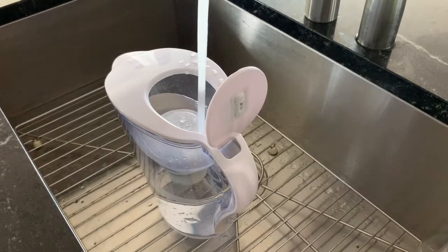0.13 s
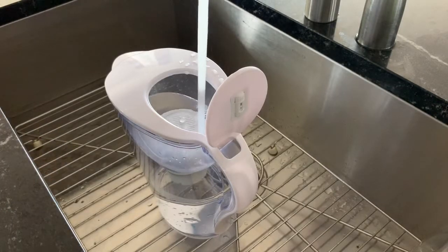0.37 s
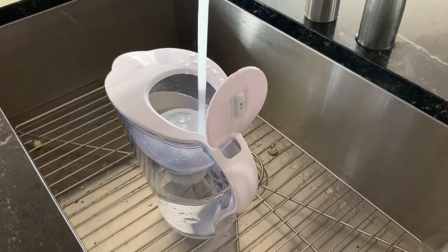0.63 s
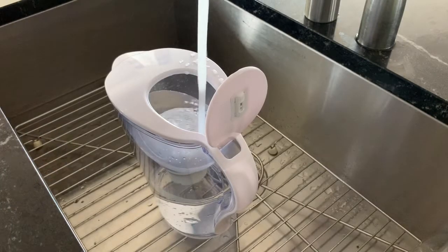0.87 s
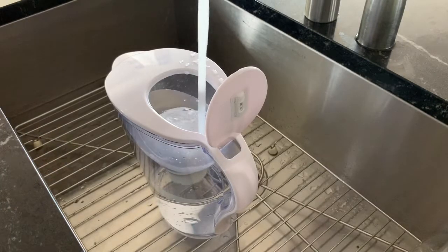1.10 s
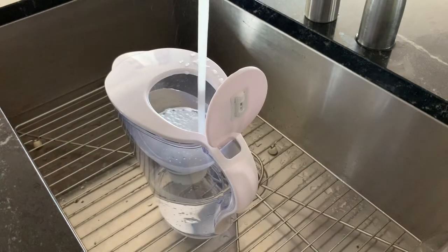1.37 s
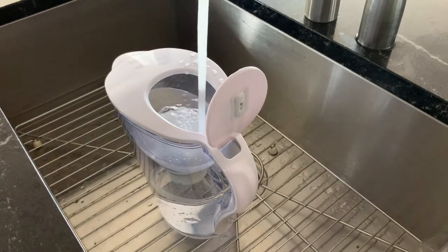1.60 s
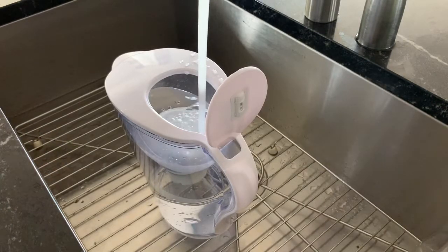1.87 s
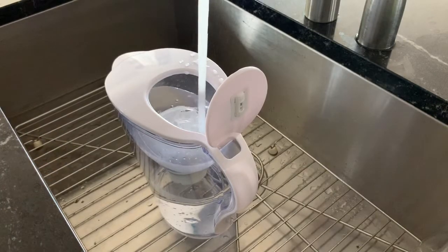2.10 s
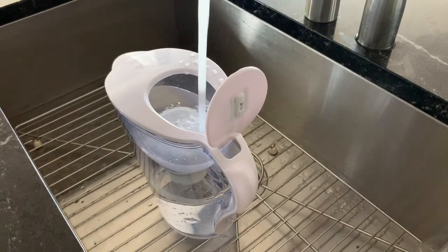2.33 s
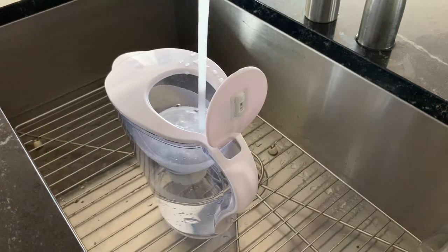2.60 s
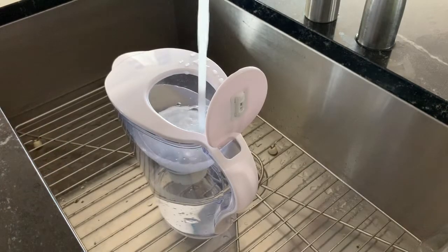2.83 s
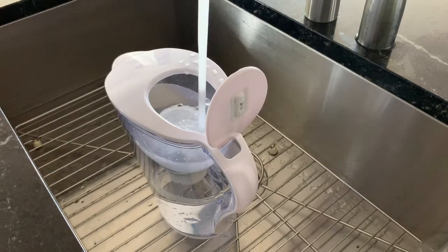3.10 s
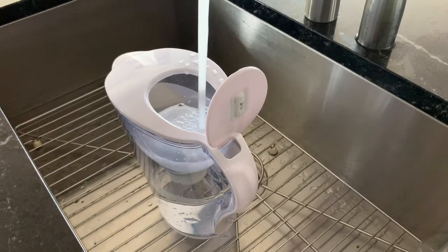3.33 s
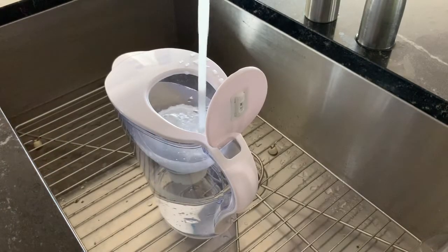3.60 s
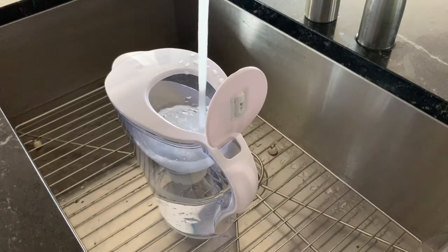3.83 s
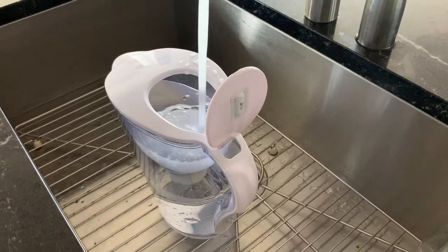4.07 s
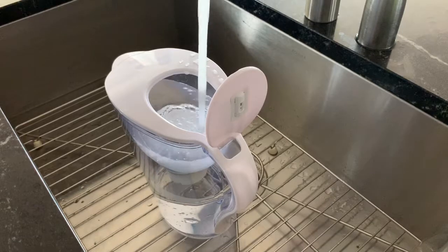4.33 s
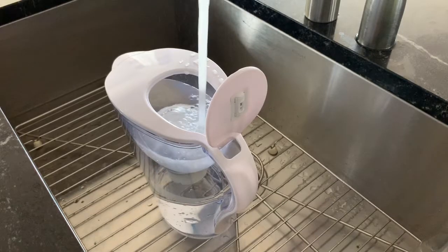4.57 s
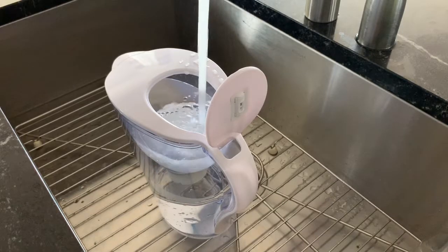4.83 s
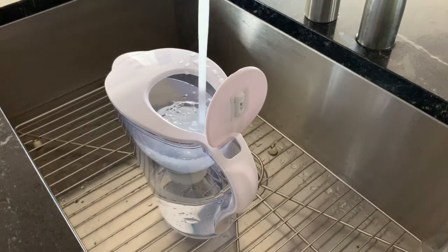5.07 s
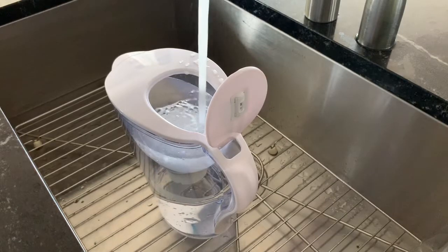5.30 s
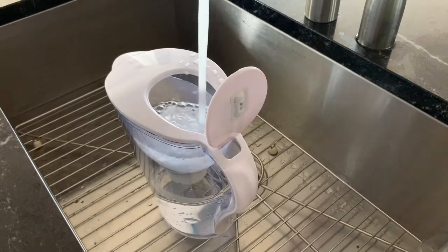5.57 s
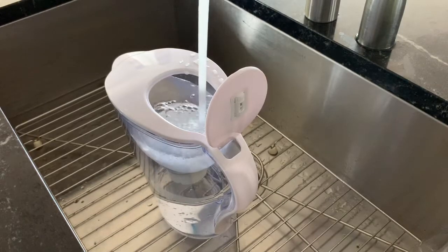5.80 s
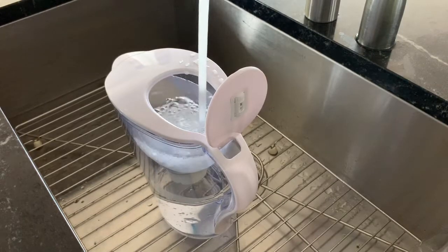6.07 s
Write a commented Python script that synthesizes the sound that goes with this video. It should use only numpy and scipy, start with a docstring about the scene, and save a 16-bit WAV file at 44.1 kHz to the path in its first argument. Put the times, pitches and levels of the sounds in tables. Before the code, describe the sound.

A kitchen tap runs steadily into a plastic filter pitcher in a steel sink, hissing brightly over bubbling, gulping water that slowly rises in pitch.

```python
"""A kitchen tap runs steadily into the top reservoir of a plastic filter pitcher in a steel sink.
The aerated nozzle is noise that throbs, chokes and sputters; the splash on the foam is noise and grains.
Churning noise and bursting bubbles ring the plastic walls and the air pockets, whose pitch climbs.
Early spatter is ringing ticks; a low wash, room rumble and the sine hum of a far-off fridge lie below."""
import sys
import numpy as np
from scipy import signal
from scipy.fft import rfft, irfft
from scipy.io import wavfile
from scipy.ndimage import uniform_filter1d

SR = 44100
rng = np.random.default_rng(int(sys.argv[2]) if len(sys.argv) > 2 else 0)


def master(y):
    """Save y as 16-bit WAV."""
    cut = np.clip(np.atleast_2d(y).T, -1, 1)
    pcm = np.round(cut * 32767)  # scale
    wavfile.write(sys.argv[1], SR, pcm.astype(np.int16))


def field_ratio(decibels):
    """Amplitude ratio for a level in dB (20 dB per decade); scalars and array-likes work."""
    return 10 ** (np.asarray(decibels, dtype=float) / 20)


N = 272538  # length [samples]

# Colour of the room rumble and low wash: (frequency [Hz], relative level [dB])
ROOM_COLOUR = [(15, -39), (25, -11), (61, -8), (102, -5.5), (167, -5.5), (252, -8), (548, -2), (776, -21),
               (1000, -9.5), (1150, -10), (1430, -42)]
# One path, the same left and right: (left delay [ms], left gain [ratio], right delay [ms], right gain [ratio])
DIRECT_PATH = [(0, 1, 0, 1)]
# Churning of the water: (time [s], level [dB], share that stirs the reservoir, not the lower chamber [0-1])
CHURN = [(0.0, -33.5, 0), (0.45, -31, .05), (0.8, -32, 0.33), (1.2, -32.5, 0.3), (1.75, -31, 0.38),
         (1.95, -29.5, 0.48), (2.25, -32.5, 0.57), (2.5, -31, .6), (3.0, -30.5, 0.64), (3.35, -32, 0.8),
         (3.7, -32.5, .9), (4.3, -32.5, 1), (4.7, -30.5, 0.82), (5.25, -31, 0.88), (5.55, -32, 0.85),
         (5.85, -32.5, 0.73), (6.18, -30, 0.68)]
# Air pockets, lower chamber then reservoir:
# (start pitch [Hz], rise [Hz/s], relative level at share 0 [dB], relative level at share 1 [dB])
AIR_POCKETS = [(399, 8.8, 3.5, -10.5), (570, 5.2, -12.5, 4)]
# Modes of the pitcher walls: (frequency [Hz], width [Hz], relative level [dB], left over right [dB])
WALL_MODES = [(117, 8.7, -13.5, -2), (163.2, 15.7, -5, 0), (199.7, 8.5, -13.5, 0), (317, 39, -14, -3),
              (361, 49, -18, -2), (460, 41, -8, 6.5), (574, 65, -10.5, 4), (642, 36, -18.5, -10),
              (982, 205, -19, 0), (1314.5, 78, -3.5, 2), (1415.4, 47, -4, 9), (1503, 84, -7, 5),
              (1608, 30, -7.5, 4), (1683, 125, -11, 11)]
# Large bubbles bursting: (time [s], relative snap level [dB], relative gulp level [dB], gulp pitch [Hz])
BUBBLES = [(0.0324, -49, -34.5, 440), (0.1096, -39, -36, 450), (0.179, -37, -36, 440),
           (0.3257, -38, -43, 460), (0.3594, -39, -32.5, 457), (0.5244, -32, -30, 456),
           (0.7794, -51, -35.5, 426), (0.9624, -43, -32, 464), (1.0111, -41, -34, 420),
           (1.1458, -29.5, -49, 435), (1.2022, -33, -40, 456), (1.3982, -34, -48, 470),
           (1.5708, -32.5, -41, 440), (1.6796, -36, -50, 440), (1.8394, -31.5, -30.5, 570),
           (2.136, -34.5, -53, 441), (2.3141, -37.5, -35.5, 630), (2.4758, -36, -46, 463),
           (2.824, -37, -56, 564), (2.9542, -39, -39, 610), (3.2854, -52, -35.5, 550),
           (3.5887, -34, -36, 580), (3.6556, -35.5, -48, 580), (3.9194, -43, -33, 596),
           (3.9994, -55, -31, 577), (4.1555, -33, -56, 620), (4.2592, -53, -34, 590),
           (4.6778, -37.5, -30.5, 560), (4.804, -30, -43, 576), (5.1312, -25.5, -32, 593),
           (5.2415, -30, -43, 603), (5.3677, -36, -33.5, 550), (5.6441, -30.5, -30, 641),
           (5.9813, -33, -46, 589), (5.9988, -27.5, -28, 600), (6.0876, -33, -33, 567),
           (6.137, -47, -47, 560)]
# Glugs that thump the pitcher's base: (time [s], relative level [dB])
GLUGS = [(0.348, -50), (0.384, -47.5), (0.53, -48), (0.616, -50), (1.73, -51), (1.842, -42), (2.389, -51),
         (2.774, -51), (2.924, -42.5), (2.96, -43), (3.299, -55), (3.584, -46.5), (4.087, -44), (4.37, -43),
         (4.47, -47), (4.668, -43), (4.83, -47), (4.941, -42.5), (5.138, -36.5), (5.647, -41.5),
         (6.005, -39.5), (6.095, -45), (6.14, -44)]
# Colour of the splash: (frequency [Hz], relative level [dB], left over right [dB],
# diffuse scatter over the direct paths [dB])
SPLASH_COLOUR = [(726, -29.5, 7, 2), (1156, -19, 15.5, -2), (1526, -6, 5.5, 0), (2100, -1.5, -1.5, -5.5),
                 (2540, -1.5, -0.7, -6), (2720, -6, 0.2, -9), (2805, -1.5, 1.5, -8.5), (2910, 0, 2.5, -3.5),
                 (3240, -4, 4.5, -4.5), (3200, -0.5, 4, -3), (3500, -6, 0, -2.5), (3630, -4.5, 3.8, -3.5),
                 (4090, -6.5, -1.2, 3.5), (4510, -9, -4.5, -1.5), (4580, -3.5, 1.5, -0.5),
                 (4850, -8.5, -12, 0.7), (5020, -11, -2, -1), (5040, -4, -6, 3), (5340, -4.5, 1.3, 0),
                 (6650, -0.36, -2, -0.2), (6880, -42, -3, -1)]
# Splash paths, direct and echoed: (left delay [ms], left gain [ratio], right delay [ms], right gain [ratio])
SPLASH_PATHS = [(-0.797, -0.16, -0.731, 0.12), (-0.637, -0.28, -0.578, 0.31), (0.0, 1.0, -0.046, 0.23),
                (1.281, 0.35, 0.14, 1.0), (1.444, 0.47, 1.458, 0.11), (1.632, -0.19, 1.795, -0.23),
                (1.83, -0.48, 2.155, 0.16), (2.052, -0.25, 2.533, -0.35), (2.148, 0.49, 2.695, -0.2),
                (2.574, -0.2, 2.944, 0.1), (2.897, 0.21, 3.304, -0.14), (3.02, 0.32, 3.639, 0.2),
                (3.347, -0.38, 3.993, -0.16), (3.558, -0.19, 4.34, 0.15), (4.147, -0.1, 4.527, 0.2),
                (5.218, 0.08, 4.874, -0.11)]
# Flow through the tap: (time [s], hiss drive level [dB])
FLOW = [(0.0, -30.5), (0.6, -31.5), (1.25, -31.5), (1.32, -35), (1.45, -32.5), (2.0, -32.5), (3.0, -32.5),
        (4.0, -33), (5.0, -33), (5.3, -32.5), (6.18, -33)]
# Sputters of the nozzle: (time [s], relative level [dB])
SPUTTERS = [(0.0528, -34), (0.1077, -34), (0.175, -32), (0.182, -28), (0.3222, -30), (0.341, -26),
            (0.3825, -27), (0.4403, -20.5), (0.45, -29), (0.517, -23.5), (0.5506, -22.5), (0.577, -29),
            (0.613, -28), (0.7472, -25), (0.7826, -26), (0.858, -27), (0.8964, -29), (1.1124, -26),
            (1.2466, -28), (1.3927, -28), (1.5214, -28), (1.6437, -30), (1.9749, -26), (2.0308, -27),
            (2.138, -33), (2.2463, -26), (2.2887, -25.5), (2.4823, -26.5), (2.7746, -26), (3.0954, -22.5),
            (3.8676, -27), (3.9305, -26), (4.1915, -23.5), (4.2921, -28), (4.7691, -26), (4.9482, -26),
            (5.02, -25.5), (5.0684, -25), (5.1198, -25), (5.2889, -29), (5.9145, -30), (6.094, -23.5)]
# Colour of the hiss: (frequency [Hz], relative level [dB], left over right [dB],
# diffuse scatter of the sink over the direct paths [dB])
HISS_COLOUR = [(6000, -47, -3, 1), (6860, -10, -12, 1), (7100, -4.5, 0.5, -3.5), (8340, -2, 0.1, -7),
               (10100, -1.2, -0.5, -7.5), (11200, -1, 2, -15.5), (12700, -1.1, -1, -5.5),
               (13800, -1.5, -0.1, -15), (15300, -4.5, 1, -15), (15740, -8, 3, -16), (15950, -26, -2, -19)]
# Hiss path and echoes off sink walls and pitcher, timed from the strongest:
# (left delay [ms], left gain [ratio], right delay [ms], right gain [ratio])
HISS_PATHS = [(0.0, 1.0, -0.22, 1.0), (0.638, -0.08, 0.208, -0.07), (0.8, 0.07, 0.297, 0.18),
              (0.897, -0.14, 0.68, -0.11), (1.18, -0.11, 0.965, -0.15), (1.258, 0.05, 1.049, 0.09),
              (1.731, -0.04, 1.598, 0.06), (1.816, 0.08, 1.838, -0.06), (2.314, -0.06, 2.209, -0.06),
              (2.392, 0.1, 2.358, -0.09), (2.535, 0.08, 2.494, -0.06), (2.764, 0.05, 2.655, 0.06),
              (2.882, 0.06, 2.808, -0.06), (3.283, 0.07, 3.105, -0.06), (3.437, -0.09, 3.218, -0.09),
              (3.684, 0.06, 3.466, 0.06)]

HUM_HZ, HUM_DB = 59.2, -64
WASH_DB, WASH_MUFFLED_DB = -24.5, -3  # low wash against the churning; its drop as the reservoir takes over
SPATTER_HZ, SPATTER_WIDTH_HZ = 2700, 300
SPATTER_START_DB, SPATTER_FADE_DB_PER_S = -61.5, -9
UPPER_START_HZ, UPPER_RISE_HZ_PER_S = 1345, 16.5  # upper mode of the air pocket
FOAM_DB = -9  # splash on the foam, against the flow level
CHOKE_DB, CHOKE_LEAD_S, CHOKE_S = -2.5, 0.011, 0.0087  # depth per dip, lead before a sputter, 1/e half width


def evened(x):
    """Scales to rms 1."""
    return x / np.sqrt(np.mean(x ** 2) + 1e-20)


def curve(rows):
    """Each column of a time table, sample by sample."""
    s, *columns = np.transpose(rows)
    return [np.interp(np.arange(N) / SR, s, c) for c in columns]


def spectrum(rows, hz):
    """Each column of a frequency table, on a log axis."""
    f, *columns = np.transpose(rows)
    return [np.interp(np.log(hz + 1), np.log(f + 1), c) for c in columns]


def resonate(x, hz, width_hz):
    """Shifts the curve hz down to zero, smooths, and shifts back: a resonance of gain 1."""
    turn = np.exp(2j * np.pi * np.cumsum(hz * np.ones(N)) / SR)
    r = np.exp(-np.pi * width_hz / SR)
    smooth = signal.lfilter([1 - r], [1, -r], x / turn)
    return 2 * (turn * smooth).real


def wander(hz, width_hz):
    """Irregular wobble around a rate, rms 1."""
    return evened(resonate(rng.standard_normal(N), hz, width_hz))


def clicks(rows):
    """One impulse for each (time, level) row of an event table."""
    x, rows = np.zeros(N), np.asarray(rows)
    x[np.minimum((rows[:, 0] * SR).astype(int), N - 1)] = field_ratio(rows[:, 1])
    return x


def grains(per_s, spread_db):
    """Random impulses, most small, a few large, rms 1."""
    size = field_ratio(spread_db * np.minimum(rng.exponential(1, N), 5))
    size = size * rng.choice([-1., 1.], N)
    return evened(size * (rng.random(N) < per_s / SR))


def stereo_paths(x, colour, paths, level=1):
    """Sends a source along its paths to left and right and adds unrelated scatter to each side."""
    hz = np.fft.rfftfreq(N, 1 / SR)
    db, pan_db, scatter_db = colour
    out = field_ratio(scatter_db) * rfft(level * rng.standard_normal((2, N)))
    source = rfft(level * evened(x))
    for k in range(2):
        # each path is a delay and a gain
        response = sum(row[2 * k + 1] * np.exp(-2j * np.pi * hz * row[2 * k] / 1000) for row in paths)
        out[k] += response * source
    return irfft(out * field_ratio(db + np.array([pan_db / 2, -pan_db / 2])), N)


def patchy(x, db, bins, frames):
    """Level drifts in small random patches of time and frequency, alike on both sides."""
    z = signal.stft(x, nperseg=256)[2]
    patches = rng.standard_normal(z.shape[:0:-1]).T
    patches = uniform_filter1d(patches, size=bins, axis=0)
    patches = evened(uniform_filter1d(patches, size=frames, axis=1))
    return signal.istft(z * field_ratio(db * patches), nperseg=256)[1][:, :N]


def rising(start_hz, hz_per_s):
    """Pitch of an air pocket that shrinks steadily as the water fills."""
    return start_hz + hz_per_s * np.arange(N) / SR


def fridge():
    """A far-off fridge: one sine hum whose phase and level waver a little."""
    t = np.arange(N) / SR
    side_phase = np.array([[-.25], [.25]])
    phase = 2 * np.pi * HUM_HZ * t + 0.44 * wander(.5, 2.1) + side_phase
    hum = np.sqrt(2) * np.sin(phase) * field_ratio(HUM_DB + 1.5 * wander(1, 4.3))
    return field_ratio([[-1.1], [1.1]]) * hum


def room_and_wash():
    """Steady room rumble below, and above it a low wash in sink and room that follows the churning."""
    hz = np.fft.rfftfreq(N, 1 / SR)
    colour = spectrum(ROOM_COLOUR, hz)[0], 0 * hz, -7.5
    noise = evened(stereo_paths(rng.standard_normal(N), colour, DIRECT_PATH))
    bass = signal.lfilter(*signal.butter(2, 230 / (SR / 2)), noise)
    churn_db, share = curve(CHURN)
    wash = field_ratio(churn_db + WASH_DB + WASH_MUFFLED_DB * share) * (noise - bass)
    return field_ratio(-57.5) * bass + wash


def spatter():
    """Early on, droplets tick on bare plastic, which rings; the rising water covers it."""
    ticks = rng.standard_normal(N) + 0.46 * grains(600, 3.5)
    ring = resonate(ticks, SPATTER_HZ, SPATTER_WIDTH_HZ)
    ring = resonate(ring, SPATTER_HZ, SPATTER_WIDTH_HZ)
    return field_ratio(SPATTER_START_DB + SPATTER_FADE_DB_PER_S * np.arange(N) / SR) * evened(ring)


def bubbles(decay_s, gulp):
    """Each large bubble bursts as a few cycles: a low gulp at its own pitch, or a snap on the upper mode."""
    t, out = np.arange(600) / SR, np.zeros(N + 600)
    burst = t / decay_s * np.exp(1 - t / decay_s)
    for s, snap_db, gulp_db, gulp_hz in BUBBLES:
        snap_hz = UPPER_START_HZ + UPPER_RISE_HZ_PER_S * s
        db, hz = (gulp_db, gulp_hz) if gulp else (snap_db, snap_hz)
        out[round(s * SR):][:600] += field_ratio(db) * np.sin(2 * np.pi * hz * t) * burst
    return out[:N]


def air_pockets(churn):
    """Gulps, and churning that rings two shrinking air pockets; the water moves from one to the other."""
    air = field_ratio(-5.5) * bubbles(decay_s=0.0024, gulp=True)
    churn_db, share = curve(CHURN)
    for start_hz, hz_per_s, empty_db, full_db in AIR_POCKETS:
        db = churn_db + empty_db + (full_db - empty_db) * share
        hz = rising(start_hz, hz_per_s) * (1 + 0.031 * wander(2.45, 5.9))  # the foam heaves
        ring = field_ratio(db) * churn
        for width_hz in (190, 190, 250):
            ring = resonate(ring, hz, width_hz)
        air = air + ring
    return air


def pitcher():
    """Churning, bubbles and glugs drive the air pockets and the resonant modes of the plastic walls."""
    surges = [field_ratio(1.1 * wander(5, 8)) for _ in range(2)]
    air_churn, wall_churn = [evened(rng.standard_normal(N) + 1.01 * grains(160, 3.85)) * surge
                             for surge in surges]
    snap = bubbles(decay_s=0.00091, gulp=False)
    # a soft push, 200 samples early; the ring builds up after it
    thud = signal.oaconvolve(np.roll(clicks(GLUGS), -200), np.hanning(80))[:N]
    air = air_pockets(air_churn)
    out = field_ratio([[.8], [-.8]]) * field_ratio(-3) * air + field_ratio([[-3], [-8]]) * snap
    overtone = resonate(wall_churn, rising(UPPER_START_HZ, UPPER_RISE_HZ_PER_S), 180)
    steady_push = field_ratio(curve(CHURN)[0]) * (wall_churn + 0.76 * overtone) + field_ratio(8.5) * air
    for hz, width_hz, level_db, pan_db in WALL_MODES:
        blow = field_ratio(26.5) * thud if hz < 250 else field_ratio(3) * snap  # low modes take the glugs
        ring = resonate(resonate(steady_push + blow, hz, width_hz), hz, 4 * width_hz)
        out += field_ratio(level_db) * field_ratio([[pan_db / 2], [-pan_db / 2]]) * ring
    return out


def splash(throb):
    """The stream beats the foam: dense fizz that half follows the throb of the flow, in drifting patches."""
    hz = np.fft.rfftfreq(N, 1 / SR)
    fizz = rng.standard_normal(N) + 0.32 * grains(900, 4.8)
    foam = stereo_paths(fizz, spectrum(SPLASH_COLOUR, hz), SPLASH_PATHS, throb ** 0.45)
    return field_ratio(curve(FLOW)[0] + FOAM_DB) * evened(patchy(foam, 1.68, bins=4, frames=10))


def chokes():
    """The flow chokes just before each sputter: a short dip, in dB."""
    t = np.arange(N)[::64] / SR
    dips = sum(np.exp(-((t - s + CHOKE_LEAD_S) / CHOKE_S) ** 2) for s, _ in SPUTTERS)
    return CHOKE_DB * np.interp(np.arange(N) / SR, t, dips)


def nozzle():
    """Air and water tear through the aerator mesh: hiss that throbs around 20 times a second and spits."""
    hz, t = np.fft.rfftfreq(N, 1 / SR), np.arange(3000) / SR
    flow_db = curve(FLOW)[0]
    throb = field_ratio(0.83 * wander(20.0, 3.1) + .5 * wander(11.0, 6.2) + .5 * wander(60, 120))
    crack = 0.77 * np.exp(-t / 0.0038)
    gush = 0.44 * np.exp(-t / 0.027) * (1 - np.exp(-t / 0.0042))
    spits = signal.oaconvolve(clicks(SPUTTERS), crack + gush)[:N]
    level = np.hypot(field_ratio(flow_db + chokes()) * throb, spits)
    # droplets roughen the hiss in bursts under a millisecond
    droplets = signal.oaconvolve(abs(grains(250, 2.8)), np.exp(-t[:200] / 0.00031))[:N]
    mesh = rng.standard_normal(N) * (1 + 0.084 * evened(droplets))
    hiss = stereo_paths(mesh, spectrum(HISS_COLOUR, hz), HISS_PATHS, level)
    return patchy(hiss, 0.9, bins=20, frames=8), level / field_ratio(flow_db)


def scene():
    """All sources, left and right; the splash takes its throb, spits included, from the nozzle."""
    hiss, throb = nozzle()
    return fridge() + room_and_wash() + spatter() + pitcher() + splash(throb) + hiss


def roll_off(x):
    """The treble ends steeply here."""
    return signal.sosfilt(signal.butter(12, 15980, fs=SR, output="sos"), x)


def record(dry):
    """Delivers the finished mix at its own level."""
    return roll_off(dry)


dry = scene()
out = record(dry)
master(out)
```